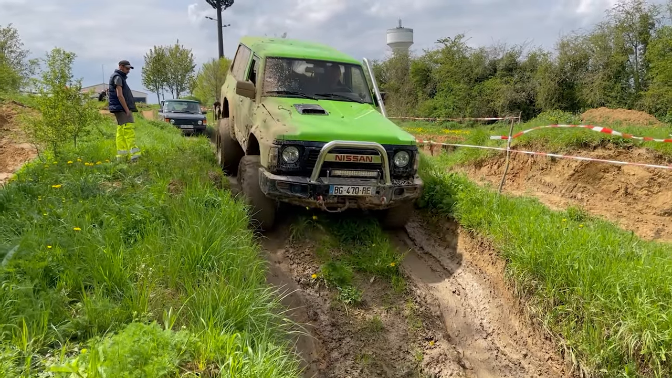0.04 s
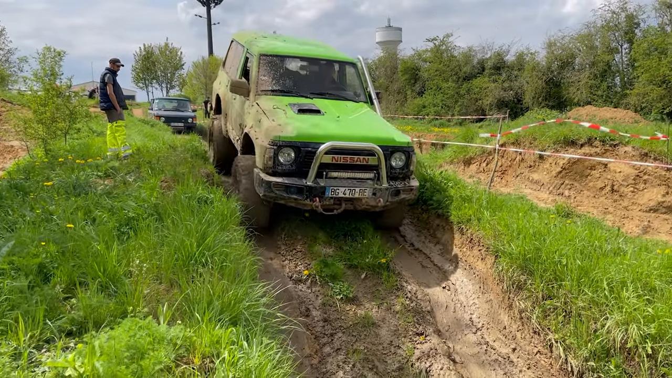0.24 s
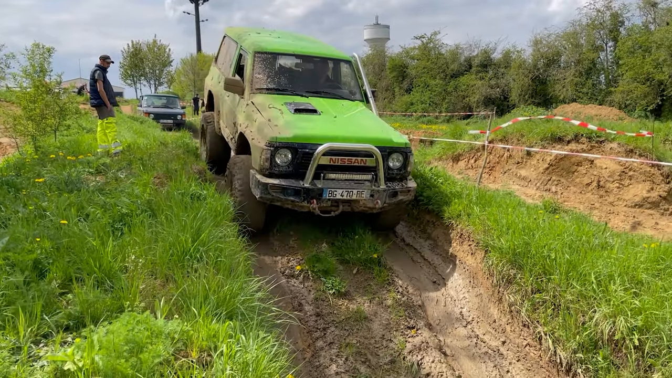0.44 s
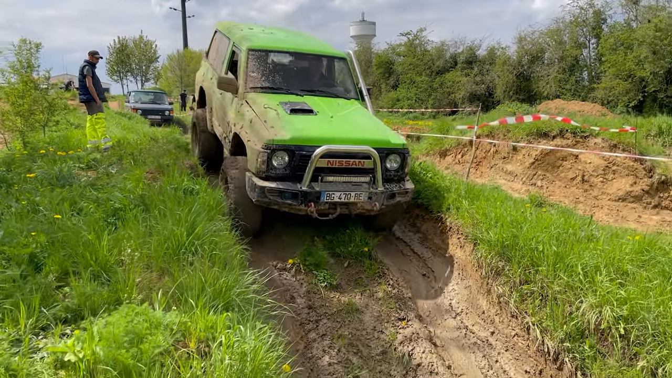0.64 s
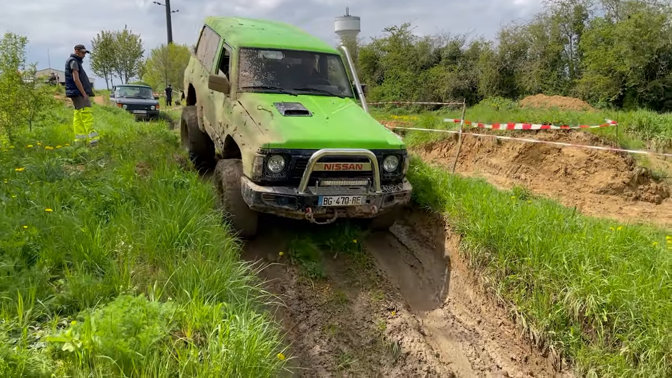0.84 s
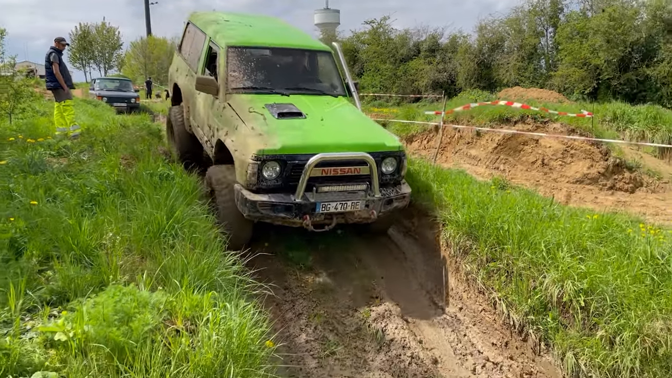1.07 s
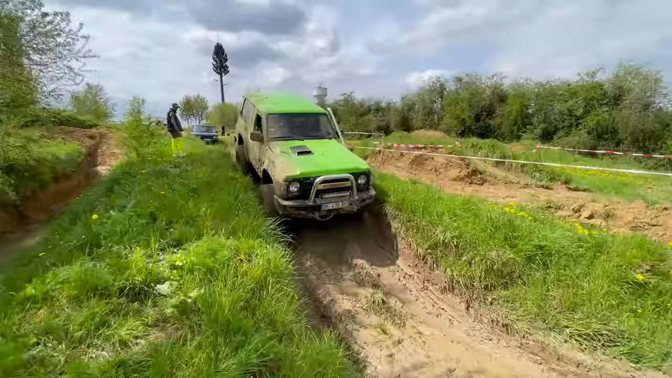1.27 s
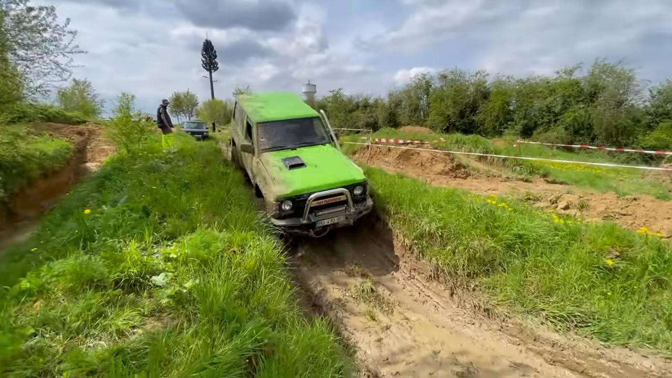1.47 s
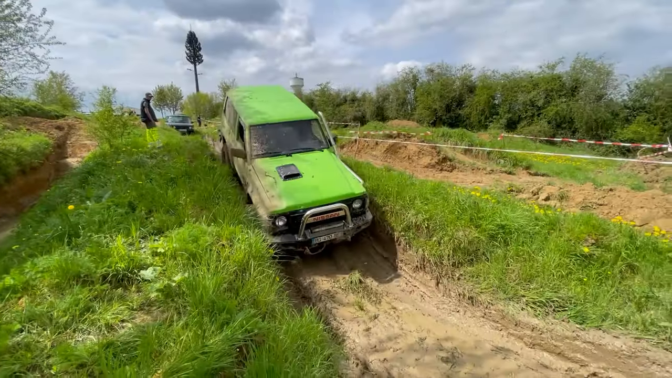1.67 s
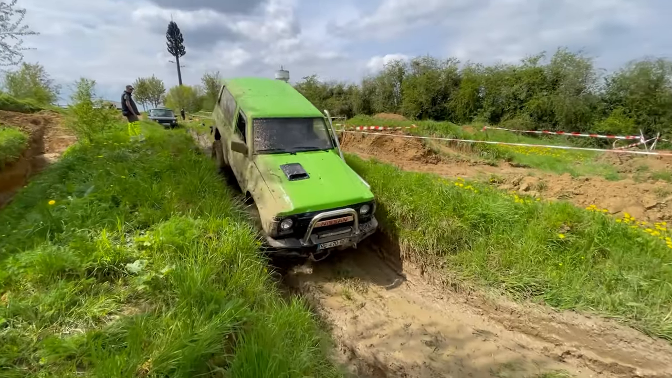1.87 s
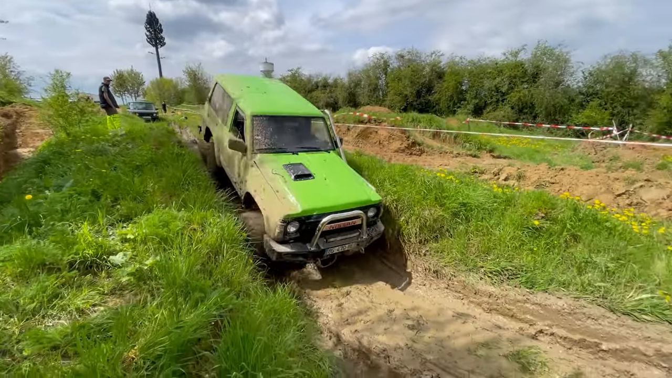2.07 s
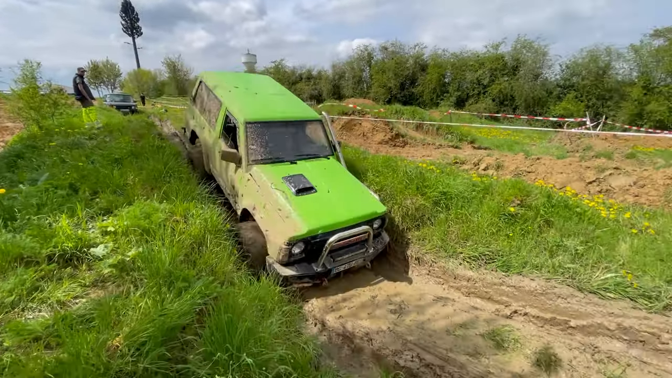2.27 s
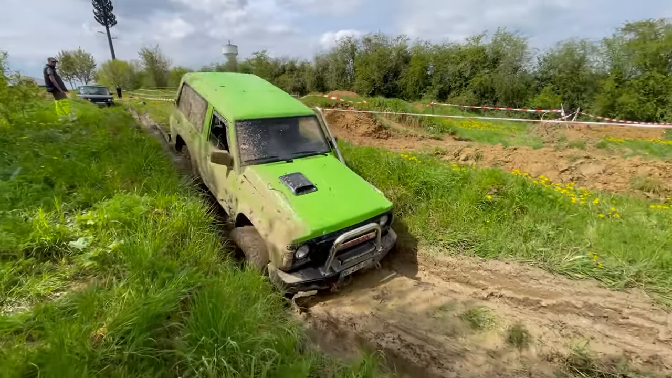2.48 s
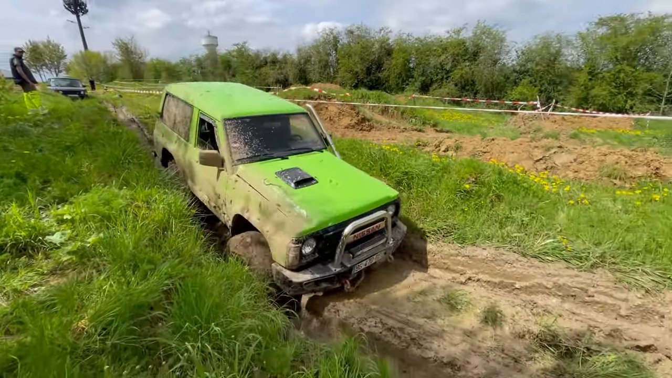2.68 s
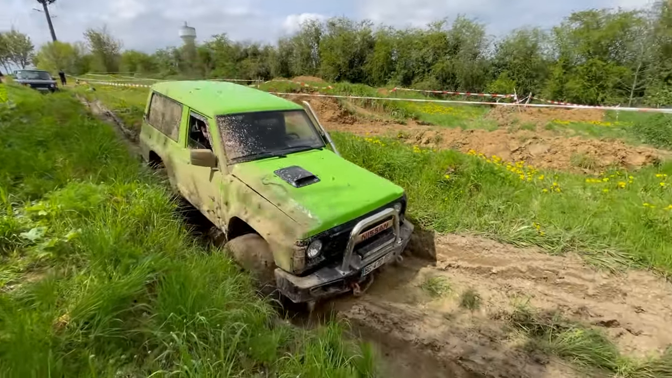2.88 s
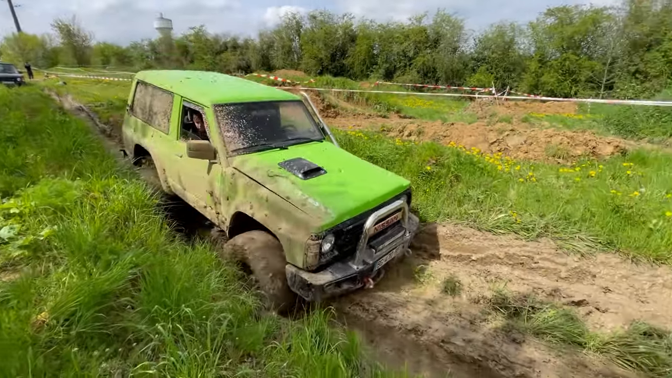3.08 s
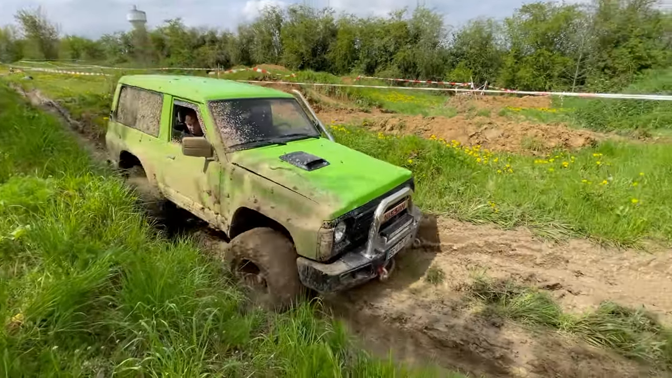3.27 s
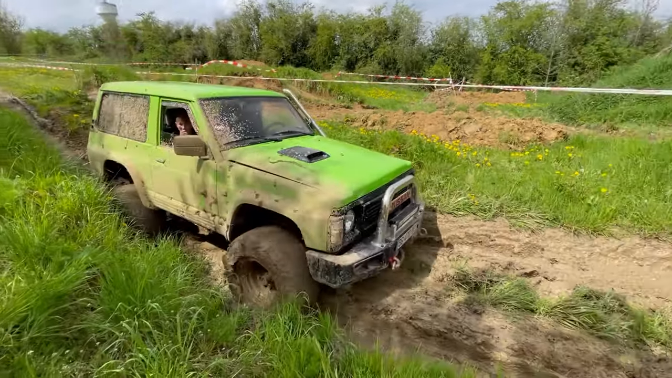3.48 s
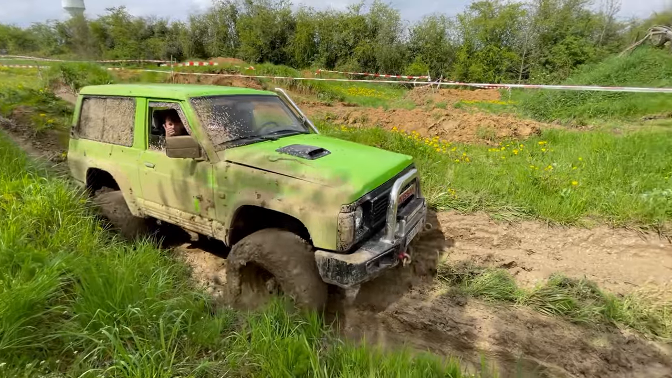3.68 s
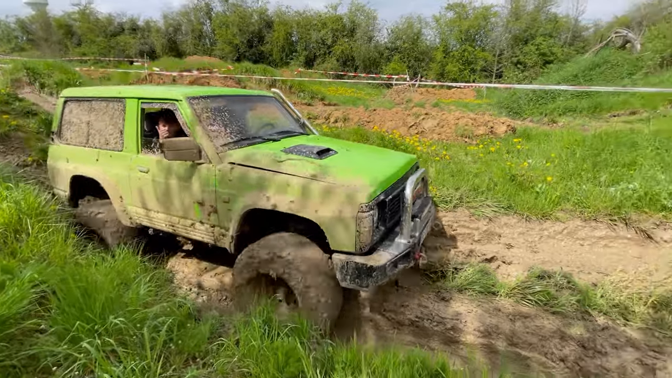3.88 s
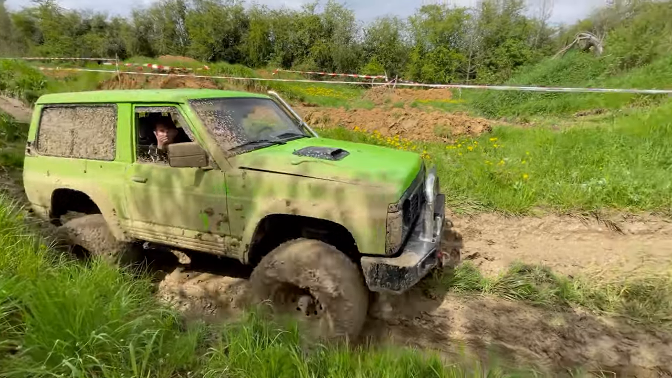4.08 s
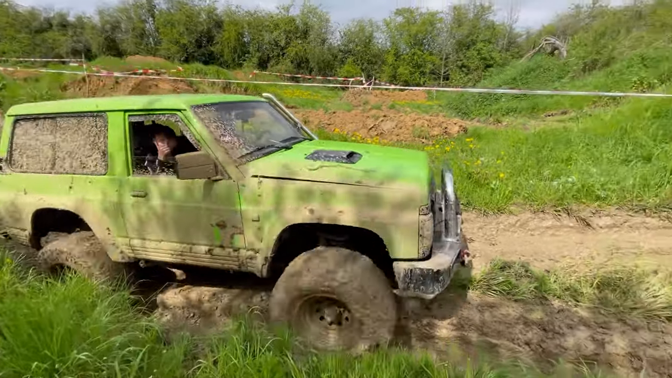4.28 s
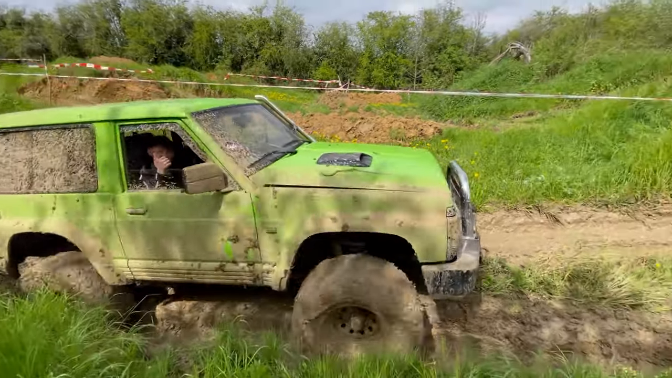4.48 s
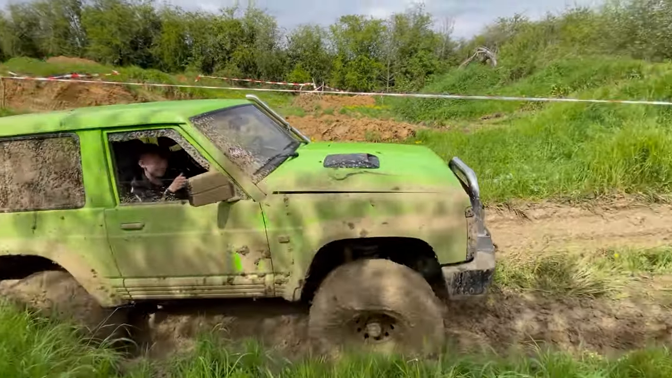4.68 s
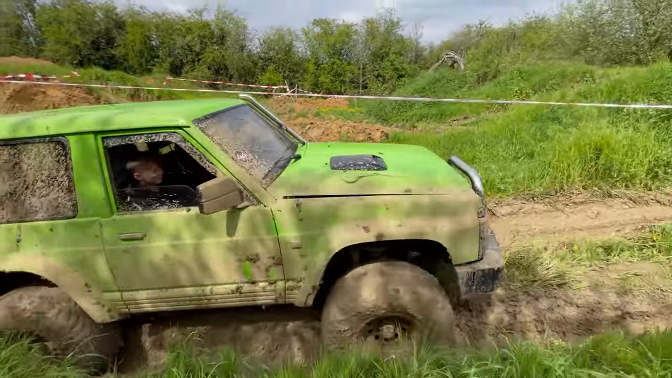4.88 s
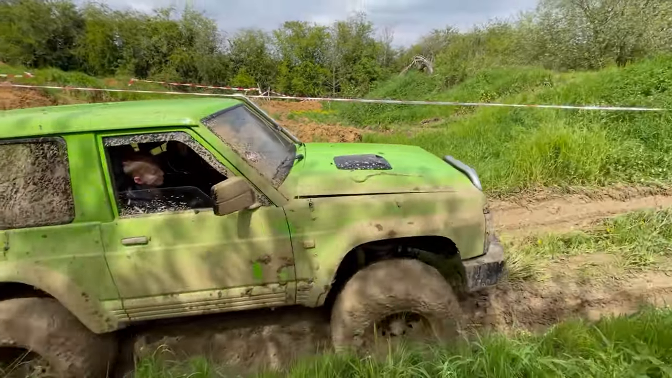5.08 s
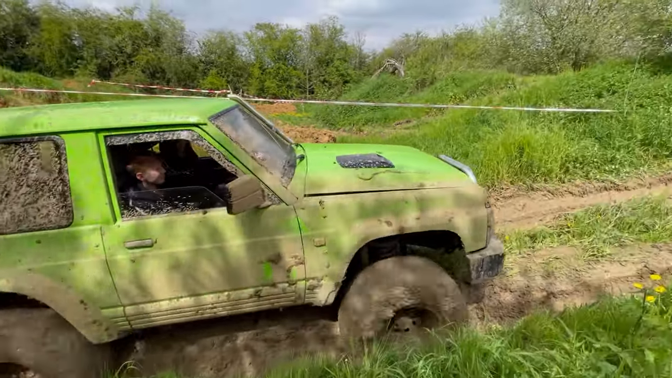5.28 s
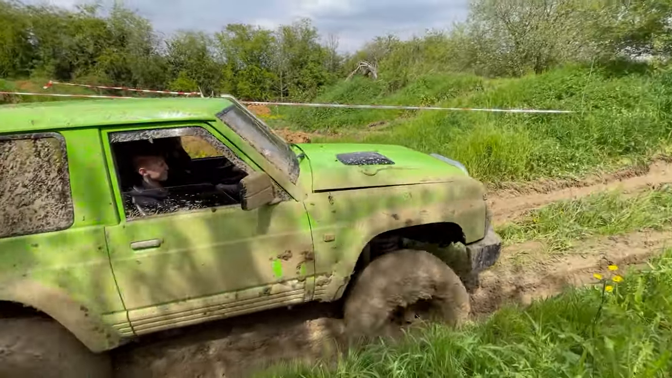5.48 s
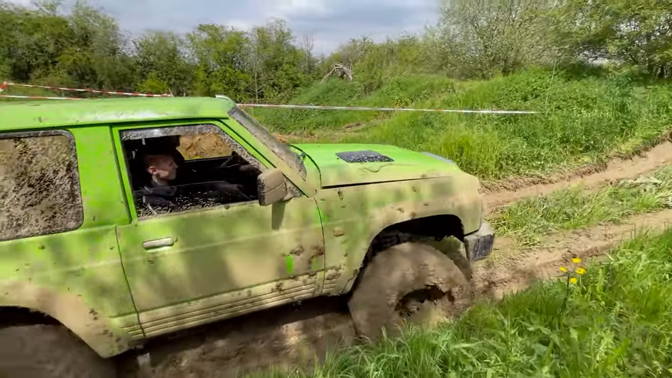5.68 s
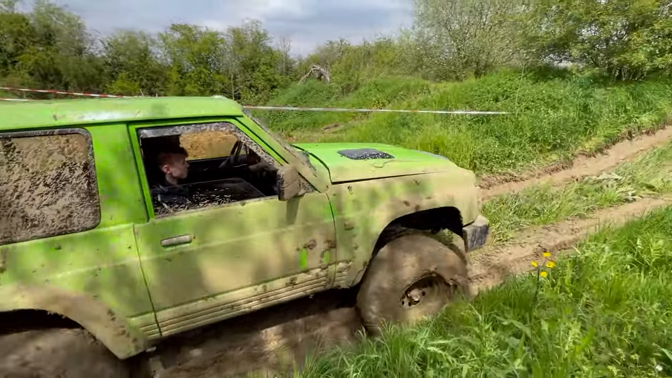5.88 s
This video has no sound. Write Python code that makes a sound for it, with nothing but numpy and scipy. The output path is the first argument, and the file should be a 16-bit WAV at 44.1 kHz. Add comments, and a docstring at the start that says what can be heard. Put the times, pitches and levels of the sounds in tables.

```python
"""A six-cylinder off-road car idles, crawls down a muddy rut and then pulls hard past a phone.
Its exhaust carries the pitch: harmonics of the firing rate, and pipe modes struck by unequal cylinders.
A gear whine follows the engine; loose parts knock and squeak, mud slaps, and the engine bay rings.
Filtered noise forms the rumble, roar, clatter, hiss and spray, throbbing with the firings.
The phone's two ports colour most of the sound differently, and change their aim once."""
import sys
import numpy as np
from scipy import signal
from scipy.fft import irfft
from scipy.io import wavfile
from scipy.ndimage import uniform_filter1d

SR = 44100
rng = np.random.default_rng(int(sys.argv[2]) if len(sys.argv) > 2 else 0)


def to_wav(s):
    """Save 16-bit WAV."""
    ch = np.atleast_2d(s).T  # columns
    pcm = np.round(np.clip(ch, -1, 1) * 32767)  # PCM
    wavfile.write(sys.argv[1], SR, pcm.astype(np.int16))


N = 261951  # length in samples

# Engine speed and firing tone. Each row: time in seconds, firing rate in Hz,
# rms level in dB of the firing tone, rms level in dB of its octave (levels before the left-right balance).
ENGINE = [(0.0, 40.39, -51, -36), (0.4, 40.37, -56, -35), (0.99, 39.49, -59, -36), (1.42, 44.48, -52, -38),
          (1.65, 49.28, -46, -34), (1.97, 53.04, -36, -30), (2.25, 50.93, -32, -27),
          (2.48, 52.72, -32, -26), (3.02, 54.54, -29, -28), (3.18, 47.76, -37, -32),
          (3.24, 47.31, -39, -27), (3.35, 54.16, -23, -19), (3.52, 63.49, -20, -17),
          (3.67, 68.66, -20, -21), (4.0, 63.51, -19, -18), (4.3, 66.84, -19, -19), (4.52, 67.51, -20, -19),
          (4.92, 63.11, -21, -17), (5.26, 63.76, -21, -16), (5.65, 62.31, -21, -16),
          (5.94, 67.97, -17, -15)]
# Phase of the firing tone, nose on and then tailpipe side. Each row: time in seconds, lead in radians.
TONE_LEAD = [(0, -2.5), (1.5, 2.5), (3.2, 5.5), (3.3, 6), (3.6, -2)]
# Higher firing harmonics. Each row: multiple of the firing rate, rms level at idle in dB, lead in radians.
IDLE_TONES = [(4, -47, -3.1), (6, -55, .6), (7, -60, -1), (8, -58, .5), (9, -60, 2.2)]
# The twelfth swells as the throttle closes. The row: centre in seconds, spread in seconds, rise in dB.
LIFT_OFF = (3.05, 0.046, 12.8)
# Level of the uneven-cylinder beat. Each row: time in seconds, rms level in dB.
LOPE = [(0, -38), (.6, -38.5), (1.1, -36.5), (1.5, -40.5), (2.0, -34), (2.7, -30), (3.0, -33), (3.25, -29),
        (3.6, -29.5), (4.5, -33), (5.94, -25.5)]
IDLE_HZ = 40  # firings a second at rest
IDLE_FADE_DB_PER_HZ = -1  # the higher harmonics fade as the speed rises
TWELFTH_DB, TWELFTH_DB_PER_HZ = -32.5, -0.5473  # it leaves the pipe's resonance as the speed rises
WAVER_DB = 0.31  # rms waver of the tone and octave; the twelfth wavers twice as much
BASS_LEFT_DB = 3.5  # left over right


def exhaust():
    """Periodic firing gives a harmonic series; unequal cylinders add a beat and the gears a whine."""
    rate, tone_db, octave_db = curves(ENGINE)
    above_idle_hz = rate - IDLE_HZ
    turns = .2 + np.cumsum(rate) / SR  # firings so far
    phase = 2 * np.pi * turns
    tone_db = tone_db + WAVER_DB * wobble(0.024)
    octave_db = octave_db + WAVER_DB * wobble(0.013)
    twelfth_db = TWELFTH_DB + TWELFTH_DB_PER_HZ * above_idle_hz + bump(*LIFT_OFF)
    twelfth_db = twelfth_db + 2 * WAVER_DB * wobble(0.06)

    tones = amp(tone_db) * np.cos(phase + curves(TONE_LEAD)[0])
    tones += amp(octave_db) * np.cos(2 * phase)
    tones += amp(twelfth_db) * np.cos(3 * phase + 2.4)
    for multiple, idle_db, lead in IDLE_TONES:
        level_db = idle_db + IDLE_FADE_DB_PER_HZ * above_idle_hz
        tones += amp(level_db) * np.cos(multiple * phase + lead)
    tones += gear_whine(phase)
    beat = amp(curves(LOPE)[0]) * lope(rate, turns)
    balance = amp([[BASS_LEFT_DB / 2], [-BASS_LEFT_DB / 2]])
    return (np.sqrt(2) * tones + beat) * balance  # root two turns rms into peak


# Firing strengths above the mean, idling and pulling. Each entry: one cylinder's relative strength,
# in firing order; the sixth is weak.
IDLING = [.47, -.09, .14, .04, .26, -.82]
PULLING = [.34, .04, -.06, -.16, .57, -.73]
# Exhaust modes. Each row: frequency in Hz, width of one pass in Hz, relative gain in dB idling,
# relative gain in dB pulling.
PIPE = [(120, 39, -7, 10), (139, 26, 1, -20), (142, 30, -20, 0)]
SCATTER = .07  # rms random part of a firing's strength


def lope(rate, turns):
    """Impulsive excitation of pipe modes: unequal firings ring the pipe, in a pattern set by load."""
    load = np.clip((rate - 53) / 10, 0, 1)  # inferred from speed
    count = np.floor(turns + .58 + .2 * load).astype(int)  # load brings the firing a little earlier
    cylinder = (count - 1) % len(IDLING)
    strength = (1 - load) * np.take(IDLING, cylinder) + load * np.take(PULLING, cylinder)
    strength += SCATTER * rng.standard_normal(count[-1] + 9)[count]
    pulses = strength * np.diff(count, prepend=0)
    ring = 0
    for hz, width, idle_db, pull_db in PIPE:
        mode = resonate(resonate(pulses, hz, width), hz, width)
        ring = ring + amp(idle_db + load * (pull_db - idle_db)) * mode
    return ring / np.sqrt(uniform_filter1d(ring ** 2, SR // 2) + 1e-20)  # running rms of 1


# Gear whine, coming and going under load. Each row: time in seconds, rms level in dB before it wavers.
WHINE = [(0, -62), (3.3, -58), (3.4, -47), (3.6, -42), (3.7, -35), (3.82, -34), (4.03, -45), (4.2, -41),
         (4.45, -38), (4.65, -42), (4.97, -47), (5.08, -36), (5.2, -38), (5.5, -34), (5.62, -38),
         (5.72, -49), (5.9, -35), (5.94, -35)]
WHINE_ORDER = 40 / 6  # whine cycles per firing


def gear_whine(phase):
    """A gear-mesh tone keeps a fixed ratio to engine speed; small random phase drift roughens it."""
    level_db = curves(WHINE)[0] + 1.0 * wobble(0.05)
    return amp(level_db) * np.cos(WHINE_ORDER * phase + 0.25 * wobble(0.06))


# Depth of the throb, hardest around idle. Each row: time in seconds, swing in dB, lead in radians.
BEAT = [(0, 2.2, 2.4), (1.15, 3, 2.4), (1.3, 1, 2.5), (3.1, .8, 3.2), (3.6, .5, .7), (4.7, 1.3, .7),
        (5.5, 1.2, -.6)]


def throb():
    """Amplitude modulation at the firing rate, as a level swing in dB."""
    depth_db, lead = curves(BEAT)
    return depth_db * np.cos(2 * np.pi * np.cumsum(curves(ENGINE)[0]) / SR + lead)


# Knocks of loose chassis parts. Each row: start in seconds, nominal peak in dB, pitch in Hz,
# decay by 60 dB in seconds.
KNOCKS = [(1.246, -21, 940, .07), (1.339, -29, 3450, .08), (1.346, -27, 2500, 0.078),
          (1.274, -32, 546, .07), (1.2737, -26, 1910, 0.05), (1.719, -20.5, 1620, 0.11),
          (1.9007, -22, 1560, .04), (2.0753, -20, 1590, 0.046), (2.112, -25, 590, .07),
          (2.125, -19.5, 640, 0.14), (2.129, -10.5, 1580, 0.045), (2.171, -23, 720, 0.09),
          (2.28, -26, 660, .08), (2.303, -21, 620, 0.061), (2.337, -20, 1370, 0.079),
          (2.349, -26, 1990, .05), (2.617, -20, 1000, 0.075), (2.622, -17.5, 930, .09),
          (2.63, -18, 780, .1), (2.634, -19, 3220, .05), (2.633, -29, 1750, 0.037), (2.638, -15, 1640, .06),
          (2.646, -20, 1730, 0.1), (2.652, -25, 490, 0.088), (2.959, -26, 620, .05),
          (2.9648, -19, 1550, .035), (2.9659, -20, 2700, 0.037), (4.205, -15.5, 1610, 0.045),
          (4.7408, -17, 1600, .05), (5.3274, -19, 1520, 0.046), (5.3883, -10, 1720, 0.039),
          (5.42, -17, 2020, .04), (5.4357, -19, 1700, .04), (5.53, -16, 1680, 0.025),
          (5.5445, -7, 1550, 0.045), (5.551, -18, 1550, 0.054), (5.56, -21.5, 1230, 0.082),
          (5.7335, -11.5, 1620, 0.032), (5.743, -7, 1330, 0.081), (5.9216, -15, 1500, .05)]


def knocks():
    """Impact excitation: a strong click sets a narrow resonance ringing."""
    return bursts(KNOCKS, .2, 450, click=18, skirt_share=.7)


# Mud slaps and spits from the tyres. Each row: start in seconds, nominal peak in dB, brightest Hz,
# decay by 60 dB in seconds.
SPLATS = [(0.8548, -26, 2720, 0.035), (1.338, -23, 3500, 0.063), (1.4462, -23.5, 8080, 0.08),
          (1.484, -22.5, 5600, 0.045), (1.6784, -25.5, 3450, 0.065), (2.1497, -25, 4840, 0.055),
          (2.3401, -24, 5100, 0.14), (2.6174, -19, 3880, 0.096), (2.6322, -13.5, 3940, 0.098),
          (2.6663, -22, 3450, 0.16), (2.6952, -19.5, 5460, 0.11), (2.767, -21, 6200, 0.077),
          (2.9208, -23, 5900, 0.058), (2.9652, -25, 6000, 0.026), (4.2757, -25, 2870, 0.042),
          (4.429, -22, 3250, 0.05), (4.5351, -24, 6040, 0.077), (4.789, -25, 5810, 0.065),
          (4.9542, -20, 2900, 0.047), (5.2062, -19.5, 5730, 0.071), (5.3053, -17, 5760, 0.047),
          (5.4167, -18, 7160, 0.054), (5.47, -23, 3270, 0.055), (5.5019, -20.5, 5200, 0.17),
          (5.5448, -45.5, 5640, 0.014), (5.679, -17.5, 5600, 0.11), (5.7788, -10.5, 6800, 0.042),
          (5.8217, -29, 6120, 0.045), (5.8631, -24, 3630, 0.05)]


def splats():
    """Broadband impact noise: wet blows have a weak click and a wide, heavily damped resonance."""
    return bursts(SPLATS + spits(), 1.0, 1800, click=1.5, skirt_share=4.8)


# Effort and nearness of the car. Each row: time in seconds, rise of mechanical noise in dB
# before each source takes its share.
WORK = [(0, 0.5), (.45, 0), (.8, 4), (1.05, 5), (1.25, 5.5), (1.5, 7), (1.72, 8), (1.9, 6), (2.0, 11.5),
        (2.2, 11.5), (2.4, 9.5), (2.8, 10.5), (3.25, 10.5), (3.85, 15), (4.5, 15), (5.0, 13), (5.37, 15),
        (5.94, 16.5)]
SPITS, SPIT_DB, SPIT_S = 25, -34, 0.015  # count, lowest level before the work rise, decay in seconds
SPIT_LOW_HZ, SPIT_HIGH_HZ = 2450, 6500


def spits():
    """Randomly timed impacts: small splats at uniform random times, louder as the car works harder."""
    when, pitch, size = rng.random((SPITS, 3)).T
    seconds = when * N / SR
    peak_db = SPIT_DB + 0.66 * np.interp(seconds, *np.transpose(WORK)) + 5 * size
    hz = SPIT_LOW_HZ * (SPIT_HIGH_HZ / SPIT_LOW_HZ) ** pitch
    return [(s, db, f, SPIT_S) for s, db, f in zip(seconds, peak_db, hz)]


def bursts(rows, width_share, lo_hz, click, skirt_share):
    """Source and resonator: a click and a decaying puff of noise pass through modes at one pitch."""
    out = np.zeros((2, N + SR // 4))
    t = np.arange(SR // 4) / SR
    for s, db, hz, decay_s in rows:
        puff = rng.standard_normal((2, len(t))) * amp(-60 * t / max(decay_s, .004))
        puff = puff + click * (t == 0)
        puff = resonate(puff, hz, width_share * hz) + 1.7 * resonate(puff, hz, 0.15 * hz)
        puff = resonate(band(puff, lo_hz, 19300), hz, skirt_share * hz)
        port_hz, *port_db = np.transpose(PORTS[int(s > TURN_S)])
        # table levels are as heard, so the mean port gain at this pitch is divided out
        heard = np.mean([amp(np.interp(hz, port_hz, d)) for d in port_db])
        out[:, round(s * SR):][:, :len(t)] += amp(db) / heard * puff / abs(puff).max()
    return aimed(*ports(*out[:, :N]))


# Thin squeaks. Each row: start in seconds, length in seconds, frequency in Hz,
# rms level in dB before the swell and port gains, left gain in dB.
SQUEAKS = [(2.333, 0.049, 5050, -34, -11), (4.752, 0.082, 9350, -36, -7), (4.8, 0.14, 9460, -39.5, -6)]


def squeaks():
    """Friction-driven vibration: rubbing parts give short, near-pure tones that swell and die."""
    out = np.zeros((2, N))
    for s, length, hz, db, left_db in SQUEAKS:
        t = np.arange(0, length, 1 / SR)
        swell = np.sin(np.pi * (t / length) ** .7) ** 2
        phase = 2 * np.pi * hz * t + .3 * wobble(.006)[:len(t)]
        tone = np.sqrt(2) * amp(db) * swell * np.cos(phase)
        out[:, round(s * SR):][:, :len(t)] += tone * amp([[left_db], [1.5]])  # left, right
    return out


# Ring of the engine bay, its pitch drifting as the car turns. Each row: time in seconds, frequency in Hz,
# level in dB before throb and rattle.
BAY = [(1.15, 1500, -73), (1.25, 1500, -50), (1.55, 1520, -43), (1.72, 1570, -42), (1.95, 1590, -38),
       (2.2, 1680, -49), (2.45, 1540, -49), (2.8, 1620, -41.5), (3.25, 1570, -42), (3.6, 1510, -43),
       (4.0, 1530, -36), (4.3, 1600, -41.5), (4.7, 1610, -35), (5.0, 1540, -39.5), (5.3, 1530, -33.5),
       (5.6, 1560, -45), (5.94, 1580, -38.5)]
BAY_WIDTH_HZ = 115
BAY_UPPER, BAY_UPPER_DB = 1.23, -12.5  # second ring: pitch ratio, level relative to the first
BAY_BEAT, BAY_GRAIN_DB = 0.97, 1  # share of the throb, rms random rattle


def bay():
    """Narrow-band noise by frequency shifting: low-passed complex noise rides on a drifting carrier."""
    hz, db = curves(BAY)
    db = db + BAY_BEAT * throb() + BAY_GRAIN_DB * wobble(0.0073)
    slow = rng.standard_normal((2, 2, N)) + 1j * rng.standard_normal((2, 2, N))
    low_pass = signal.butter(N=2, Wn=BAY_WIDTH_HZ / 2, fs=SR, output="sos")
    slow = signal.sosfilt(low_pass, slow)
    rings = 0
    for noise, ratio, ring_db in zip(slow, (1, BAY_UPPER), (0, BAY_UPPER_DB)):
        carrier = np.exp(2j * np.pi * np.cumsum(ratio * hz) / SR)
        rings = rings + amp(ring_db) * (noise * carrier).real
    heard = ports(*rings)[1]  # second aim throughout
    return amp(db) * heard / np.std(heard.mean(0))


# Tyres churning wet mud. Each row: centre in seconds, spread in seconds, rise in dB before each band's share.
CHURNS = [(1.46, 0.08, -1), (2.19, 0.12, 0.5), (2.8, 0.17, 7), (4.46, 0.21, 1), (5.37, 0.26, 2)]
# Noise bands, in order: ground rumble, pipe flutter, gearbox growl, block roar, body drone,
# valve and injector clatter, tyre and mud hiss, fine spray.
# Each row: low edge in Hz, high edge in Hz, rms level at rest in dB, rise with speed in dB per Hz,
# share of work, share of churn, step in dB as the aim changes, quick unevenness in dB,
# slow unevenness in dB, share of the throb.
NOISES = [(47, 139, -41.5, -0.062, .1, .1, 5, 0.88, 5.8, .1),
          (100, 232, -55.5, 0.064, 0.65, 1.24, 6, 1.6, 1.7, .1),
          (297.5, 410, -55, 0.59, 0.66, .01, -5, 0.85, 1, 0.34),
          (65.4, 456, -45, 0.29, 0.23, 0.17, 0, 0.77, 1.2, 0.34),
          (462, 912, -47.5, 0.042, 0.5, 0.12, 0.5, 1.9, 0.24, .3),
          (995, 2460, -48, -0.013, 0.91, .01, 2, 1.3, 1.28, 0.89),
          (2390, 8430, -48, 0.068, 0.59, 0.49, -2, 1.15, 0.66, 0.42),
          (9100, 18200, -60.5, -0.19, 1, 1.15, 0, 2.1, 1.6, .45)]


def machinery():
    """Modulated band noise: each band flickers within milliseconds and shares a slower unevenness."""
    shared = wobble(0.037)
    beat_db = throb()
    faster_hz = curves(ENGINE)[0] - IDLE_HZ
    work_db = curves(WORK)[0]
    churn_db = sum(bump(*c) for c in CHURNS)
    out = 0
    for (lo_hz, hi_hz, rest_db, db_per_hz, by_work, by_churn,
         step_db, quick_db, slow_db, by_beat) in NOISES:
        flicker = amp(quick_db * wobble(0.0032) + slow_db * shared + by_beat * beat_db)
        noise = band(rng.standard_normal((2, N)) * flicker, lo_hz, hi_hz)
        before, after = (h / np.std(h.mean(0)) for h in ports(*noise))
        level_db = rest_db + db_per_hz * faster_hz + by_work * work_db + by_churn * churn_db
        out = out + amp(level_db) * aimed(before, amp(step_db) * after)
    return out


# Port colouring, one list before the change of aim and one after.
# Each row: frequency in Hz, left gain in dB, right gain in dB.
PORTS = [
    [(280, -9.5, -13), (1330, -22.5, -17), (1750, -15, -14), (2150, -22, -21), (2980, -12, -17),
     (3320, -22, -22.5), (4120, -16, -19.5), (5330, -22, -27.5), (6150, -31, -18.5), (6800, -17.5, -15.5),
     (11240, -29, -30), (13100, -53, -51), (14700, -44, -47), (15800, -42, -39)],
    [(254, -12, -15), (1060, -15, -10.5), (1227, -20.5, -14.5), (1310, -13, -11), (1550, -10, -10),
     (2177, -14.5, -20.5), (2500, -26, -22), (3360, -21.5, -16.5), (4080, -24.5, -22), (5760, -32, -18),
     (9240, -34.5, -21.5), (9700, -28.5, -31.5), (11540, -28, -27), (11820, -53, -52), (15740, -36, -37)],
]
# Likeness of the two ports, one list before and one after.
# Each row: frequency in Hz, left-right likeness from 0 to 1, radians by which the left leads.
PAIR = [
    [(250, 0.91, 0.5), (1020, 0.71, -1.1), (1370, 0.22, 1), (1720, 1, 1), (2090, 0.24, 1.5),
     (2330, 0.61, 1), (4140, 0.92, 0.85), (5900, 0.52, 2), (7230, 1, 1), (10100, 1, 5.5), (10200, 0.79, 6),
     (12400, 0.96, 9), (15100, 0.88, 14)],
    [(235, 0.79, 0), (840, 0.77, -2), (1280, 0.026, -3.5), (1550, 0.99, 0.57), (1950, 0.94, 0.5),
     (2660, 0.052, -7), (3450, 0.087, -4.5), (4670, 0.027, 10), (8080, 0.41, -12), (9480, 0.68, 2),
     (11450, 1, 9), (11500, 0.77, 5), (15000, 1, 14.5)],
]


def ports(direct, scattered):
    """Partial coherence: the right port mixes a phase-shifted direct sound with an unrelated twin."""
    size = 2048
    advance = size // 8  # room for taps that precede the sound
    log_hz = np.log(np.fft.rfftfreq(size, 1 / SR) + 1)
    out = []
    for colour, pair in zip(PORTS, PAIR):
        colour_hz, left_db, right_db = np.transpose(colour)
        pair_hz, same, lead = np.transpose(pair)
        left_db, right_db = (np.interp(log_hz, np.log(colour_hz), db) for db in (left_db, right_db))
        same, lead = (np.interp(log_hz, np.log(pair_hz), v) for v in (same, lead))
        same = np.clip(same, 0, 1)
        left = causal(left_db)
        shifted = amp(right_db) * same * np.exp(1j * (np.angle(left) - lead))
        unrelated = causal(right_db) * np.sqrt(1 - same ** 2)
        taps = np.roll(irfft([left, shifted, unrelated]), advance, 1)
        heard = signal.oaconvolve([direct, direct, scattered], taps, axes=1)[:, advance:][:, :N]
        out.append(np.array([heard[0], heard[1] + heard[2]]))
    return out


TURN_S = 1.19  # the ports change their aim


def aimed(before, after):
    """Linear crossfade from the first aim to the second, within 2.6 ms."""
    share = np.clip((np.arange(N) / SR - TURN_S) / 0.0026, 0, 1)
    return (1 - share) * before + share * after


def causal(gain_db):
    """Minimum-phase response: the phase is the Hilbert transform of the log gain."""
    log_gain = np.log(amp(np.r_[gain_db, gain_db[-2:0:-1]]))
    return np.exp(np.conj(signal.hilbert(log_gain)))[:len(gain_db)]


def resonate(x, hz, width):
    """Damped oscillator: one complex pole, whose real part rings at hz with the given width in Hz."""
    pole = np.exp((2j * np.pi * hz - np.pi * width) / SR)
    return 2 * signal.lfilter([1 - abs(pole)], [1, -pole], x).real


def band(x, lo_hz, hi_hz):
    """Band-pass filtering with a Butterworth response."""
    return signal.sosfilt(signal.butter(N=3, Wn=[lo_hz, hi_hz], btype="band", fs=SR, output="sos"), x)


def wobble(seconds):
    """Smoothed random drift of rms 1: noise averaged twice over the given time."""
    width = max(round(seconds * SR), 2)
    return evened(uniform_filter1d(uniform_filter1d(rng.standard_normal(N), width), width))


def bump(s, spread, db):
    """Gaussian swell in dB."""
    return db * np.exp(-((np.arange(N) / SR - s) / spread) ** 2 / 2)


def curves(rows):
    """Linear interpolation of each column of a time table, one value a sample."""
    s, *columns = np.transpose(rows)
    return [np.interp(np.arange(N) / SR, s, c) for c in columns]


def evened(x):
    """Power normalisation to rms 1."""
    return x / np.sqrt(np.mean(x ** 2) + 1e-20)


def amp(db):
    """Logarithmic level to amplitude: decibels to gain."""
    return 10 ** (np.asarray(db) / 20)


def scene():
    """Superposition: the sources add at the two ports."""
    return exhaust() + knocks() + splats() + squeaks() + bay() + machinery()


EDGE_HZ = 15800


def record(dry):
    """Band limiting: a linear-phase low-pass removes the top of the treble."""
    low_pass = signal.firwin(511, EDGE_HZ, window=("kaiser", 9), fs=SR)
    return signal.oaconvolve(dry, low_pass[None], "same")


dry = scene()
out = record(dry)
to_wav(out)
```